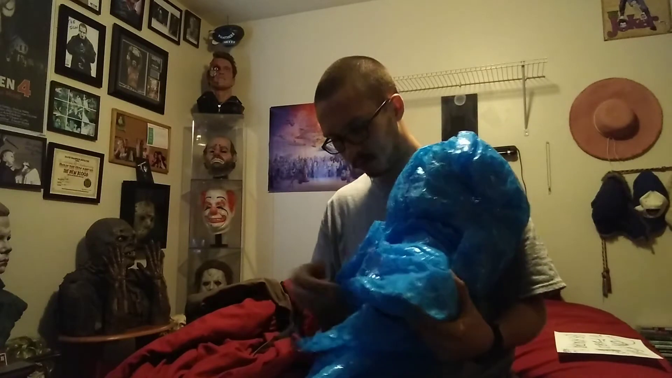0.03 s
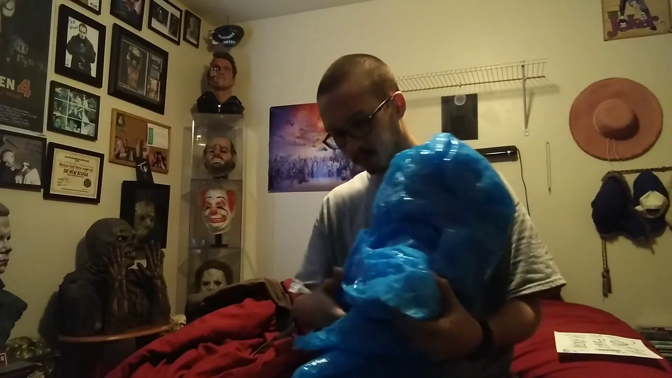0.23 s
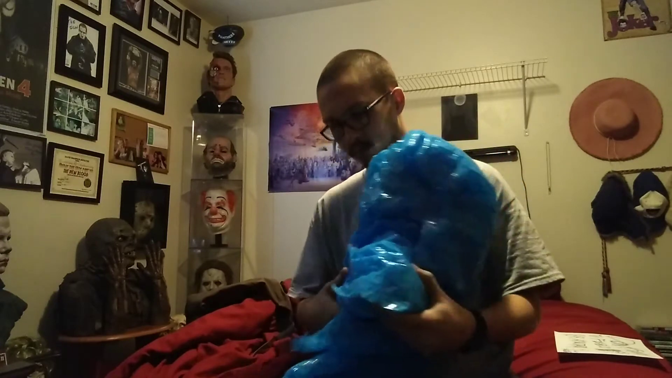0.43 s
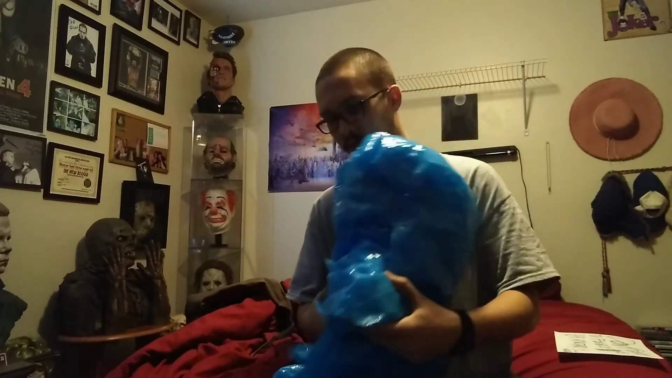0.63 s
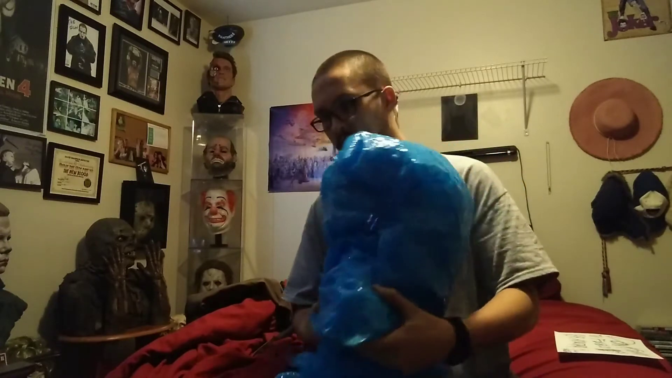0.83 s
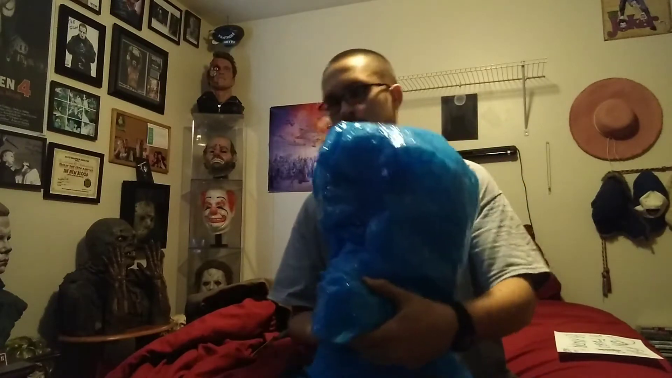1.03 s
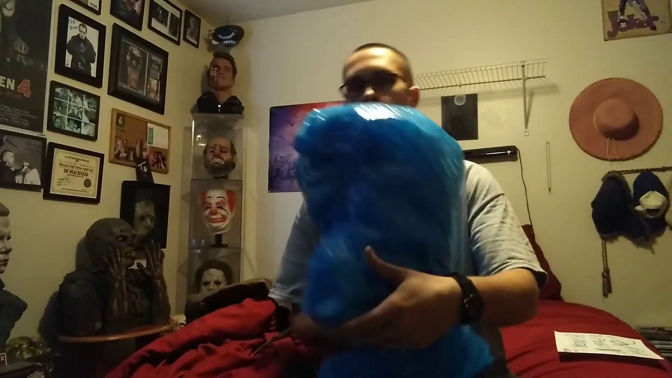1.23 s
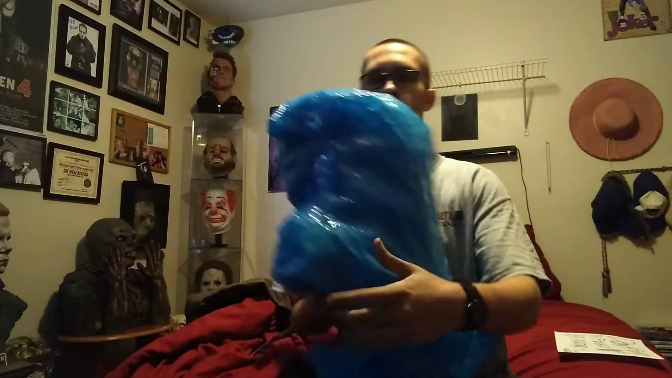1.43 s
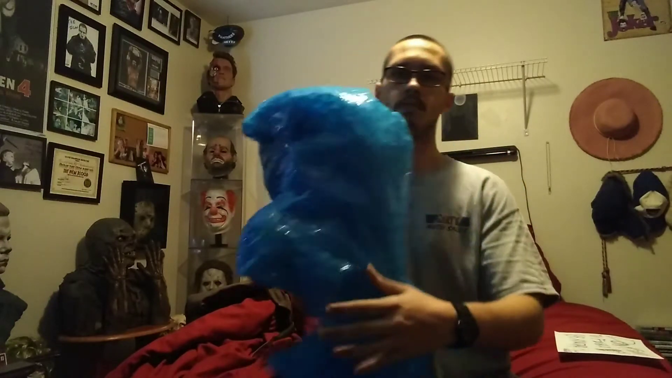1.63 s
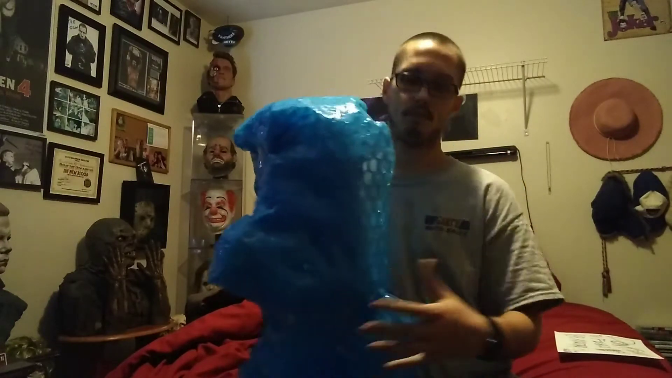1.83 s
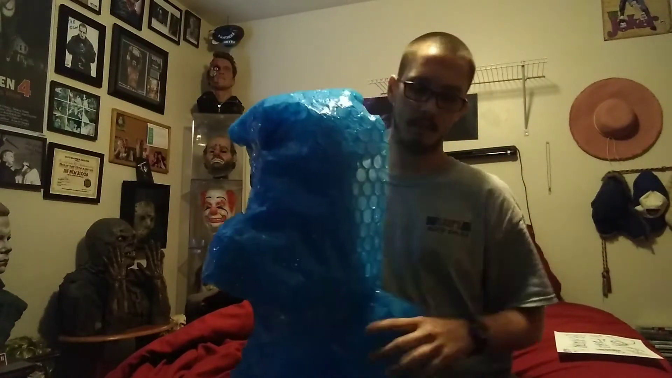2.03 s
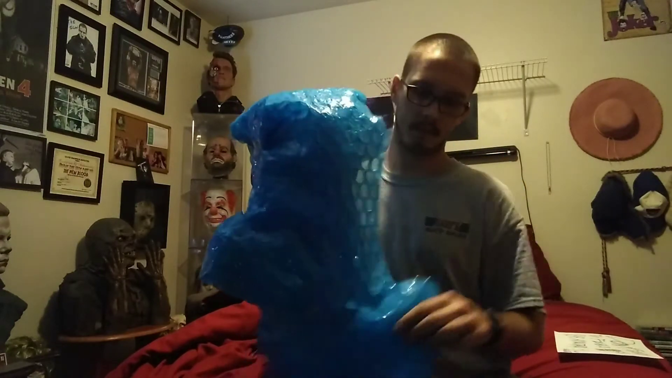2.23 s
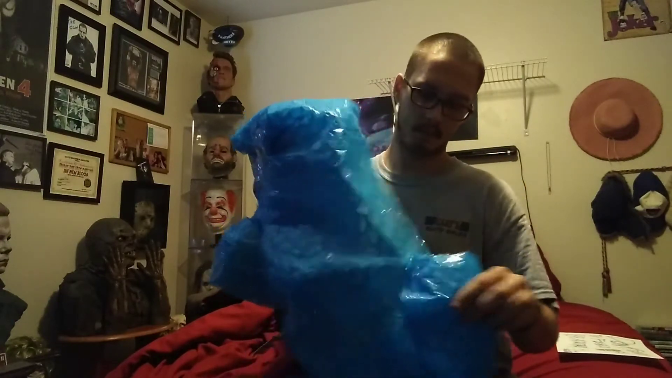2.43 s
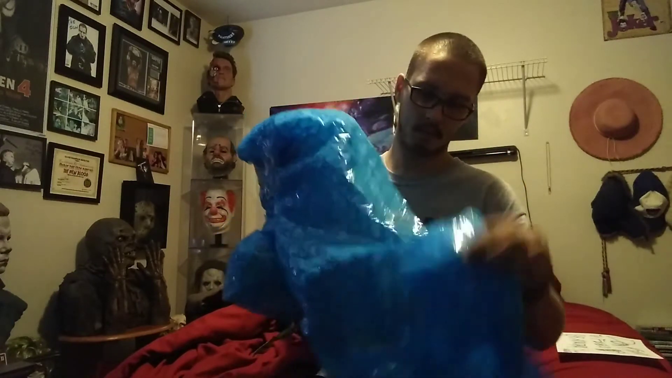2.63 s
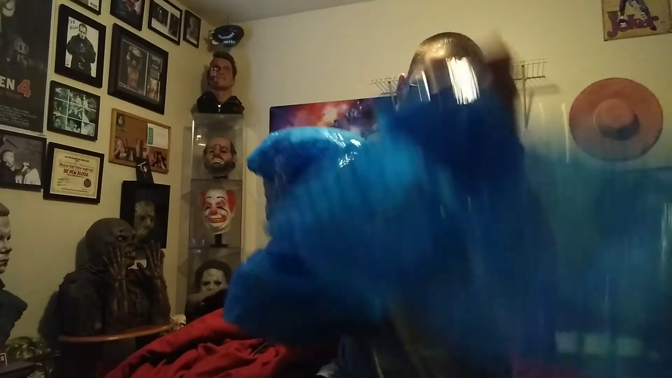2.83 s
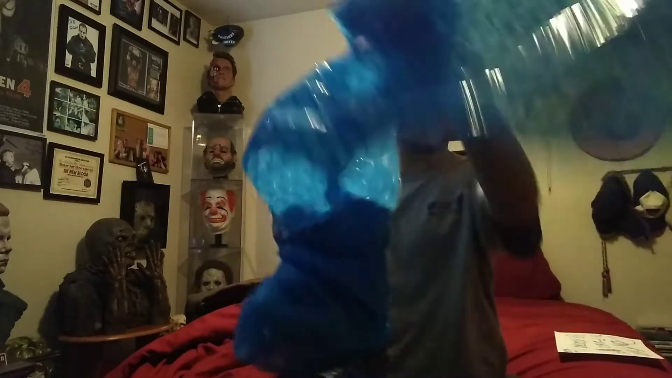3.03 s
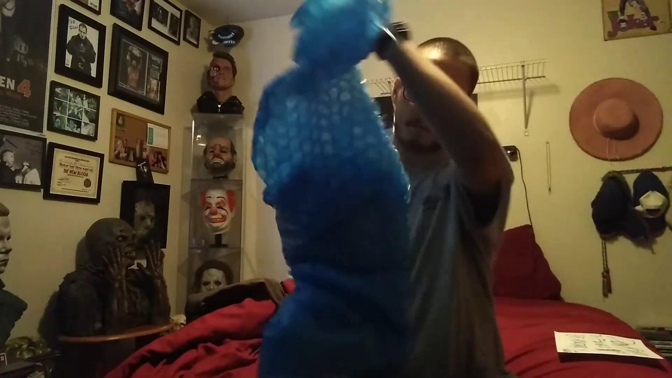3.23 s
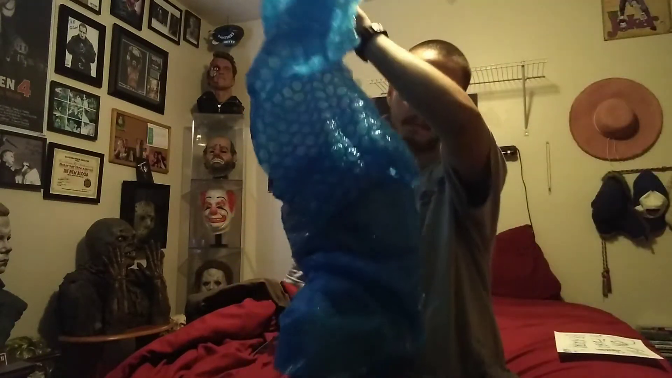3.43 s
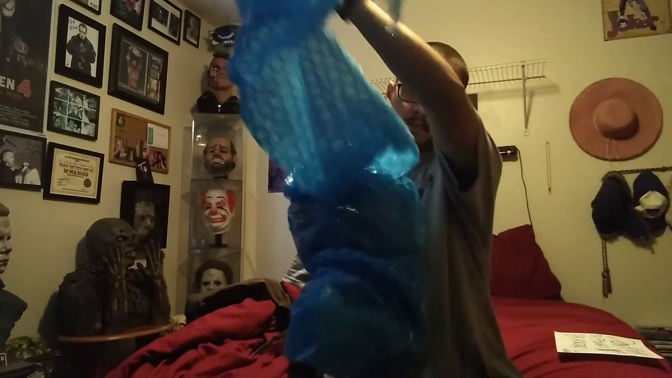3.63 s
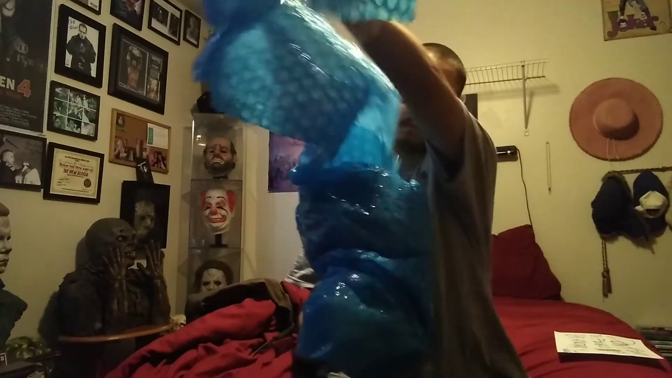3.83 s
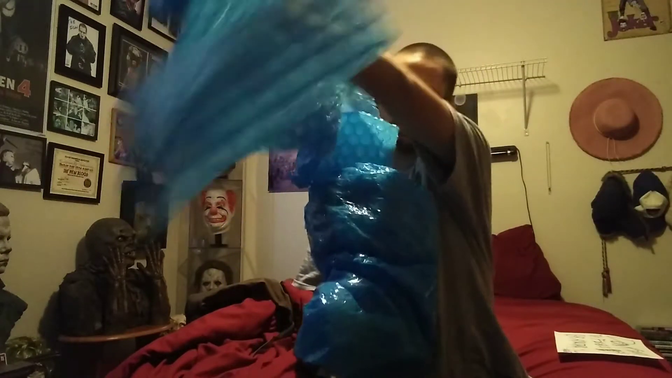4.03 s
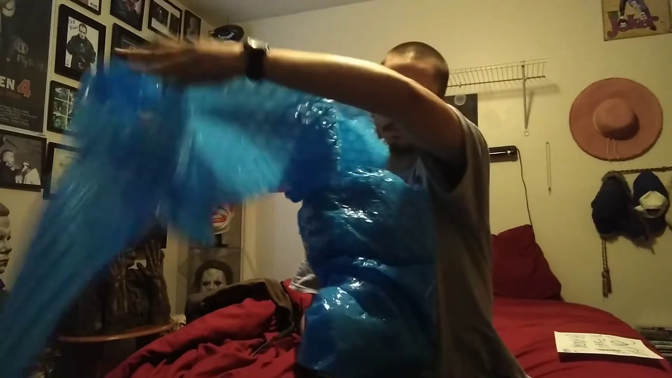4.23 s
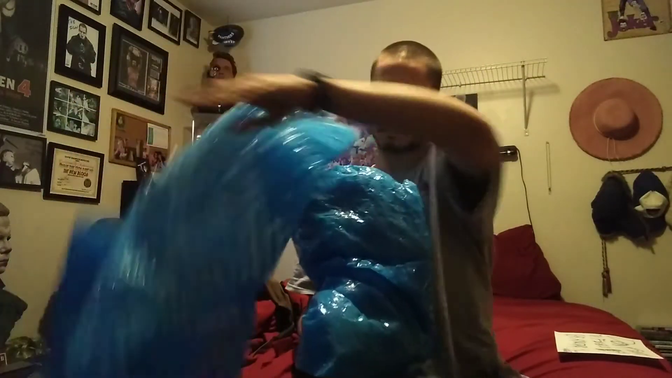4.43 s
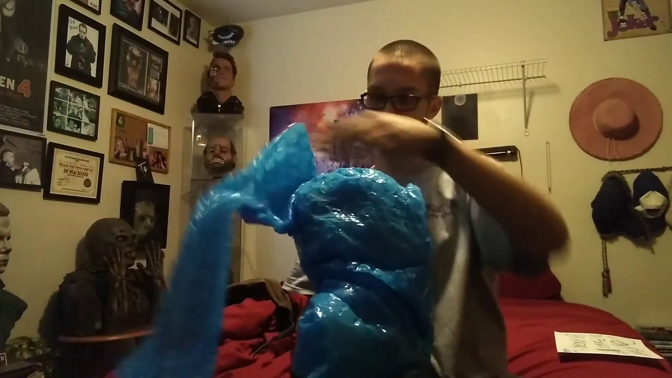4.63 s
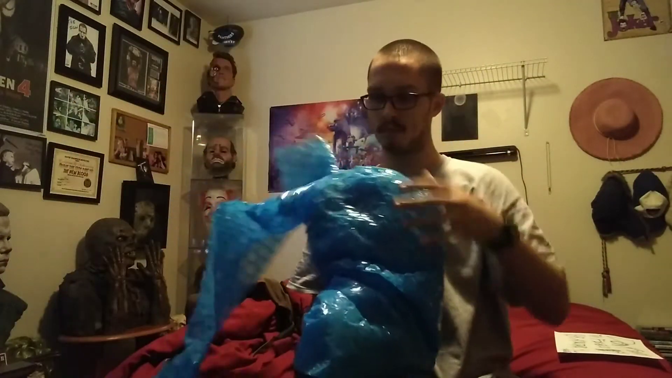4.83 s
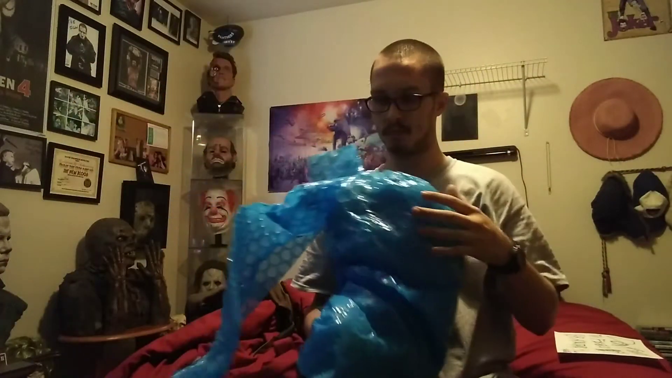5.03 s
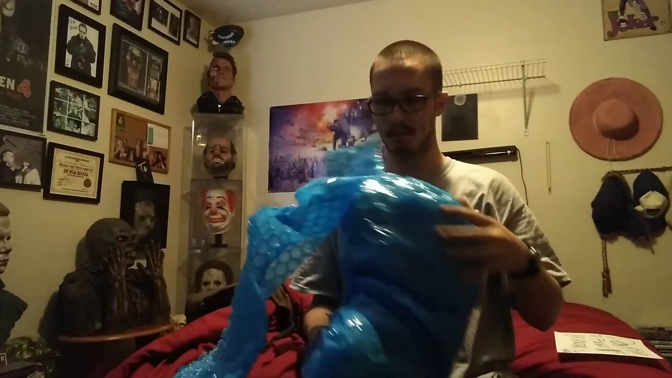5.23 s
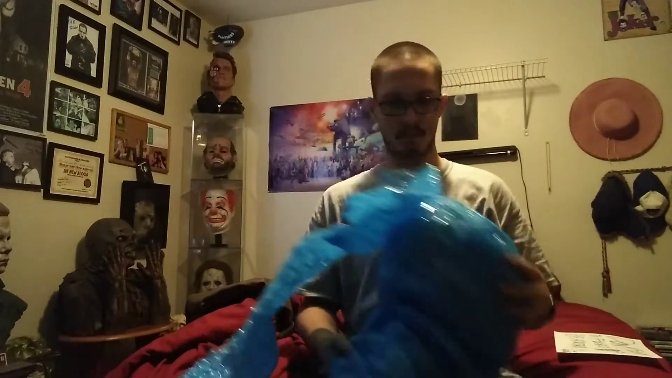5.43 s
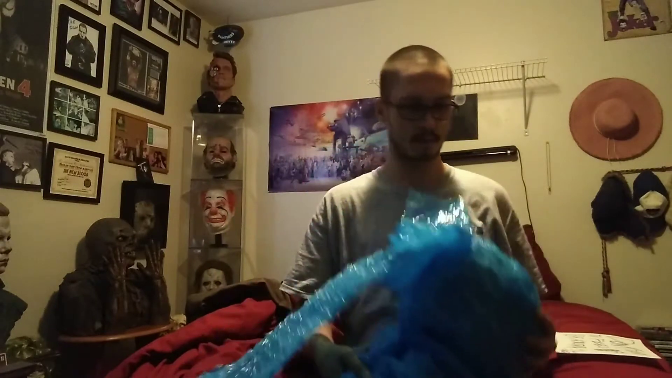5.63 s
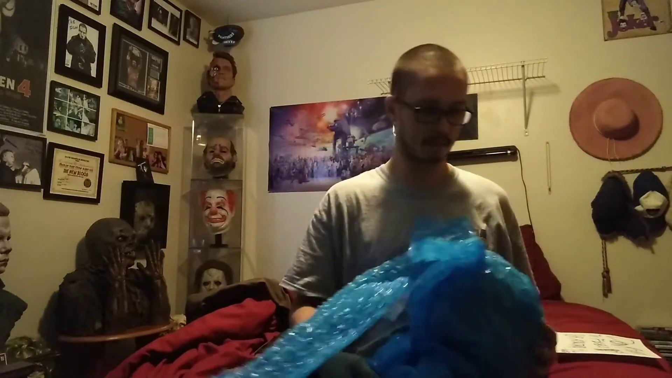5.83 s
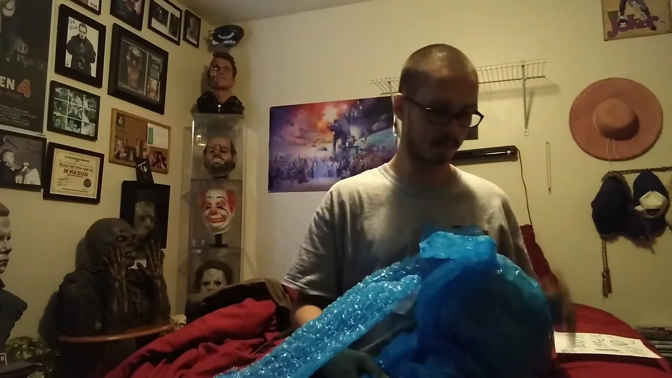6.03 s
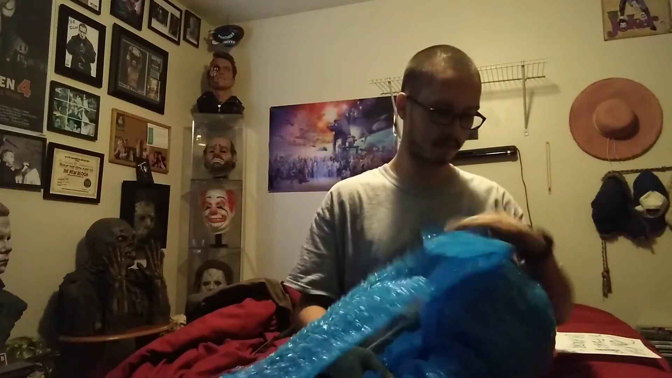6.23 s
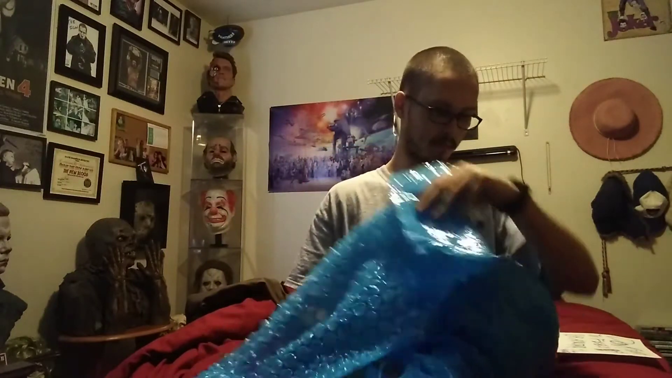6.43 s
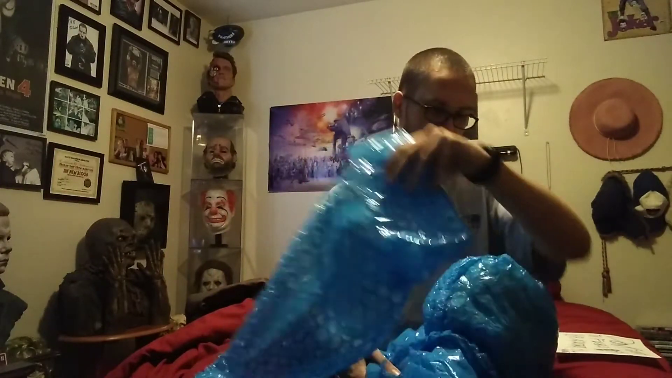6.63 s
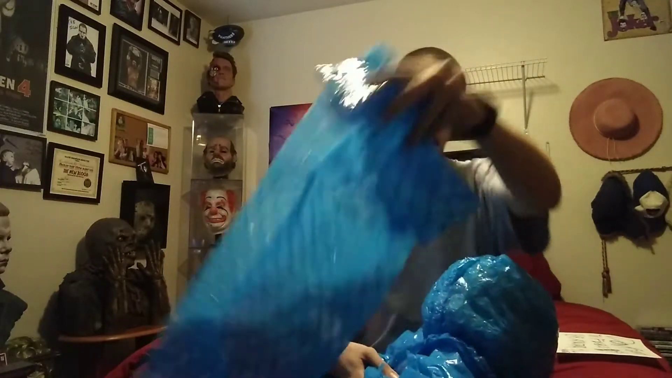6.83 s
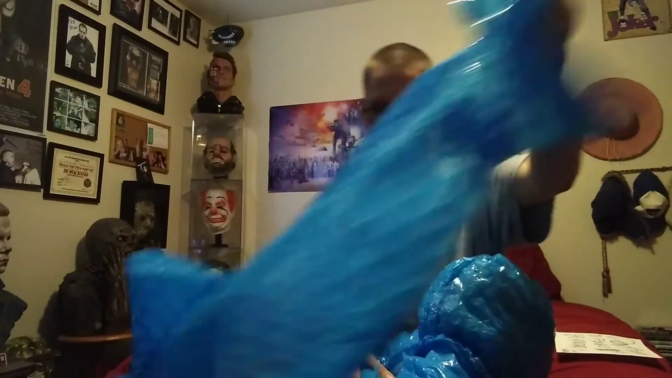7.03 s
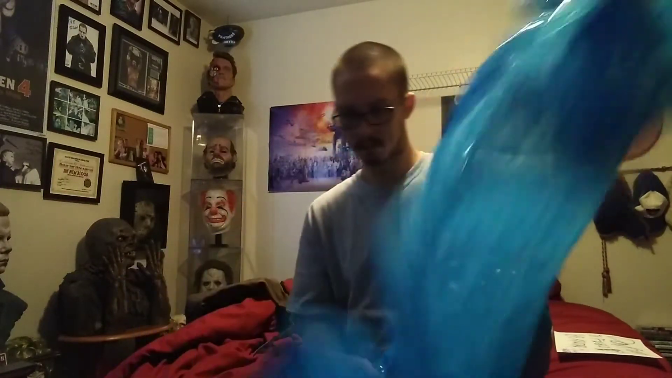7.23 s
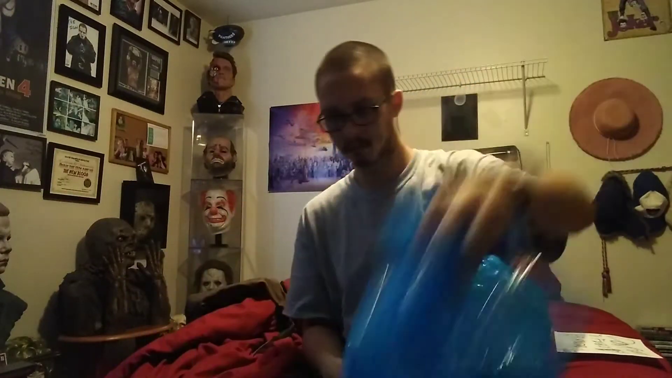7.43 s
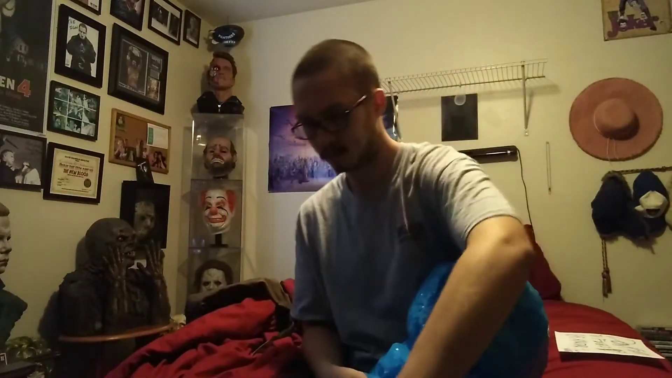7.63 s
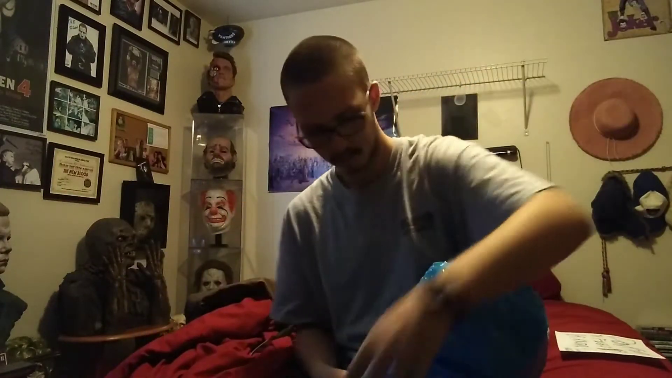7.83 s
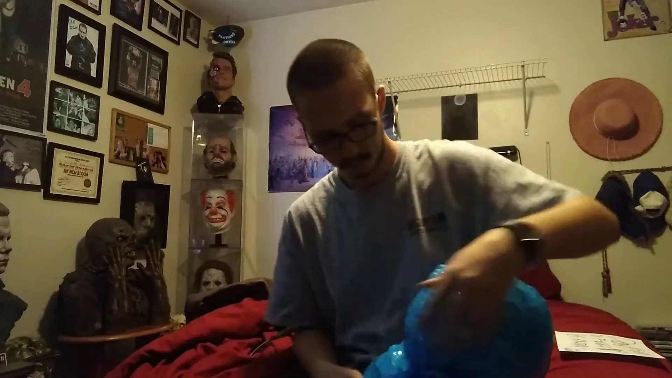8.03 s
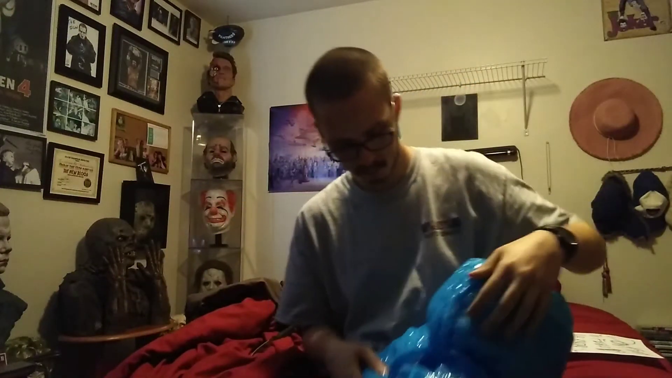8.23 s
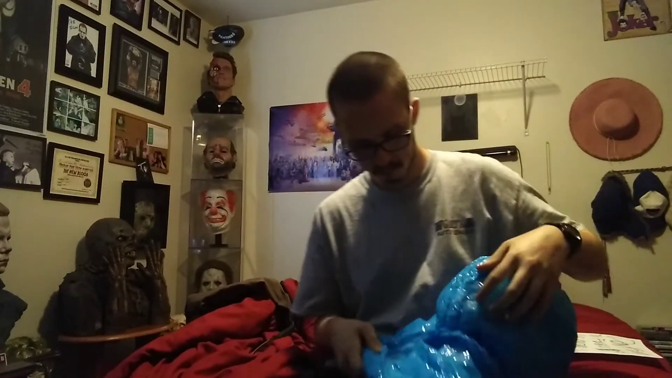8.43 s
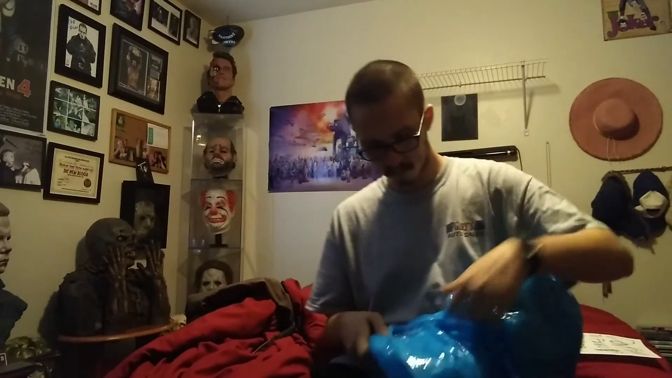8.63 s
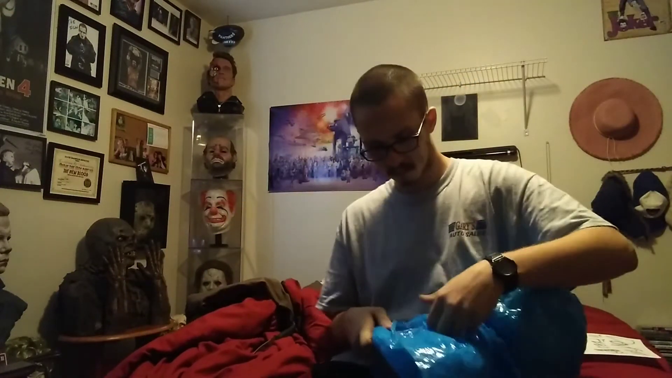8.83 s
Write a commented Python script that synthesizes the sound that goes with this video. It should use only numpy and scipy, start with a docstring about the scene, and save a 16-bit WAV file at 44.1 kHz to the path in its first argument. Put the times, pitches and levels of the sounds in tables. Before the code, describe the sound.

Thin plastic film crackles in swarms of tiny clicks as it is squeezed, pulled and flung about. Gentle at first, it grows brisker and brighter, with sharp creases snapping and hollow knocks, pauses, then gives one loud ripping burst before more swishing crinkle and soft handling. Soft muffled thuds come from the bundle. Wide stereo, short room reflections, faint low hum and still air.

```python
"""Bubble wrap being pulled off a bundled object by hand is the main source: the film buckles in swarms of tiny clicks.
Taut creases and tape let go with louder snaps (short rings plus noise bursts), and freed folds pop hollowly.
The bundle gives soft thuds, made as short fading tones. A low motor hum and still air lie underneath.
It is heard about a metre away in a small, quiet bedroom, through a camera's two microphone ports.
The camera feeds each port into the other channel to widen the stereo."""
import sys
import numpy as np
from scipy import signal
from scipy.fft import rfft, irfft
from scipy.io import wavfile
from scipy.ndimage import uniform_filter1d

SR = 44100
rng = np.random.default_rng(int(sys.argv[2]) if len(sys.argv) > 2 else 0)


def put_to_file(sound):
    """Save the sound as 16-bit audio at rate SR, in the file named by the first command-line argument."""
    columns = np.atleast_2d(sound).T  # one column per channel
    safe = np.clip(columns, -1, 1)
    whole_steps = np.round(safe * 32767)
    wavfile.write(sys.argv[1], SR, whole_steps.astype(np.int16))


N = 392490
TIME = np.arange(N) / SR
FREQS = np.arange(N // 2 + 1) * SR / N


def undb(db):
    """Turn decibels into an amplitude gain."""
    return 10 ** (np.asarray(db) / 20)


def unit(x):
    """Scale a sound to an rms of 1."""
    return x / np.sqrt(np.mean(x ** 2))


def gain_at(hz, points):
    """Read the gain of a (f/Hz, level/dB) curve, joined on a log-frequency axis."""
    f, db = np.transpose(points)
    return undb(np.interp(np.log(hz + 1), np.log(f), db))


def band(x, lo_hz, hi_hz, order=2):
    """Keep only the frequencies between two limits."""
    sos = signal.butter(order, [lo_hz, min(hi_hz, SR / 2 - 1)], "band", fs=SR, output="sos")
    return signal.sosfilt(sos, x)


def add(out, s, sound):
    """Mix a short sound into out at time s."""
    start = max(round(s * SR), 0)
    out[..., start:start + sound.shape[-1]] += sound[..., :N - start]


def room(x, t60_s, wet_db, early_s, early_db):
    """Direct sound, a quick scatter from the bundle and the body, then the bedroom's short tail."""
    t = np.arange(SR // 5) / SR
    scatter, tail = rng.standard_normal((2, 2, len(t)))
    response = undb(early_db) * scatter * np.exp(-t / early_s) / np.sqrt(early_s * SR / 2)
    # the tail builds up quickly, then falls by 60 dB in t60_s
    tail = tail * undb(-60 * t / t60_s) * (1 - np.exp(-t / 0.0041))
    response += undb(wet_db) * unit(tail) / np.sqrt(len(t))
    response[:, 0] += 1  # direct sound
    response /= np.sqrt(np.sum(response ** 2) / 2)
    return signal.fftconvolve(np.atleast_2d(x), response, axes=1)


# Pulls and squeezes of the sheet; taut film is crisp, slack folds have body.
# Columns: start t/s, rise t/s, hold t/s, effort level/dB,
# crispness (treble re effort) level/dB, body (low mids re effort) level/dB; levels before mixing trims
PULLS = [(0.118, 0.086, 0.076, -54.5, -5.5, -8), (0.323, 0.03, .042, -50, -5.5, -4.5),
         (0.49, .036, 0.012, -58.5, -6.5, -2), (0.563, 0.099, 0.013, -57.5, -5, -5),
         (0.879, .09, 0.037, -51, -6, -8), (1.06, 0.022, .075, -53.5, -7, -14),
         (1.225, .02, 0.00498, -59.5, -4.5, -5), (1.282, .065, .012, -62, -3, -5.5),
         (1.441, .028, .045, -50.5, -5.5, -13), (1.52, .04, 0.021, -56, -3, -8),
         (2.142, 0.093, 0.074, -52.5, -3, -7), (2.354, 0.045, .025, -56.5, -5, -8),
         (2.474, 0.084, .003, -43, -1, -7), (2.718, 0.054, 0.109, -54, -4.5, -9),
         (2.95, 0.067, 0.1425, -50, -3.5, -12), (3.11, 0.086, 0.046, -46, -3.5, -9),
         (3.25, .02, .034, -42.5, -1.5, -13), (3.311, 0.0448, 0.213, -51, -2.5, -11.5),
         (3.571, 0.011, 0.099, -39.5, -3.5, -11.5), (3.68, 0.03713, 0.0312, -35.5, -5.5, -8),
         (3.99, 0.019, 0.1864, -54.5, .5, -18), (4.218, .026, 0.029, -41, -2.5, -11),
         (4.441, 0.0442, .008, -57.5, -4, -19), (4.535, .09, 0.0763, -49, -4.5, -6.5),
         (4.772, 0.02, 0.0035, -58.5, -3, -16), (5.72, .13, .06, -50, -6.5, -9),
         (5.959, 0.0379, 0.024, -61.5, -8.5, -5), (6.288, 0.085, .098, -30, -6, -8),
         (6.497, 0.021, .042, -35.5, -6, -8), (6.725, 0.1515, 0.022, -46.5, -2.5, -9),
         (6.885, .055, 0.17, -41.5, -1.6, -15), (7.13, 0.0427, 0.0033, -40.5, -2, -18),
         (7.221, 0.14, 0.02403, -41.5, -4, -19), (7.395, .15, .18, -45, -3.5, -9.5),
         (7.756, 0.02703, 0.0783, -53.5, -7, -4.5), (8.166, 0.0412, 0.0079, -57, -0.5, -11.5),
         (8.599, .1, 0.0977, -57.5, -6, -3.5), (8.778, 0.073, 0.013, -49.5, -7, -4)]
# Between pulls the held bundle shifts lightly in the hands.
# Columns: t/s, effort level/dB
GRIP_EFFORT = [(0, -76), (.6, -66), (1.6, -66.5), (1.8, -74), (2.1, -71), (2.7, -61), (3.5, -61),
               (3.9, -65), (4.5, -65), (4.95, -68.5), (5.3, -65), (5.7, -67.5), (6.13, -74.5), (6.72, -68),
               (7.3, -52.5), (8.02, -63), (8.3, -67), (8.9, -54.5)]


def handling():
    """Pulls tighten, hold and settle; their power adds to the grip's. Gives effort, crispness, body in dB."""
    grip_crisp_db, grip_body_db = -4.5, -7  # re grip effort
    settle_db_per_s = 277  # the film comes to rest after every pull
    grip = undb(np.interp(TIME, *np.transpose(GRIP_EFFORT)))
    # three rows: whole effort, treble, low mids
    power = np.outer(undb([0, grip_crisp_db, grip_body_db]), grip) ** 2
    t = np.arange(SR) / SR
    for s, rise_s, hold_s, db, crisp_db, body_db in PULLS:
        tighten = np.sin(np.pi / 2 * np.minimum(t / rise_s, 1)) ** 2
        settle_s = np.maximum(t - rise_s - hold_s, 0)
        stroke = tighten * undb(db - settle_db_per_s * settle_s)
        add(power, s, np.outer(undb([0, crisp_db, body_db]), stroke) ** 2)
    effort_db, treble_db, low_db = 10 * np.log10(power)
    return effort_db, treble_db - effort_db, low_db - effort_db


# Starting colour of the crinkling film, before its three ranges are levelled.
# Columns: f/Hz, relative level/dB (per Hz)
FILM_COLOUR = [(40, -42), (90, -23), (170, -10), (270, -3), (380, -5.5), (520, 0.5), (900, 4), (1250, -2.5),
               (1900, -5.5), (3000, -7), (4500, -16.5), (8000, -22), (11000, -21.5), (15500, -13.5)]


def buckles(effort_db, per_s, growth, spread_db, colour_db, even_s):
    """A swarm of tiny clicks, denser with effort; each has its own size, colour and place on the sheet."""
    rate = per_s * undb(growth * (effort_db - np.mean(effort_db)))
    at = np.flatnonzero(rng.random(N) < rate / SR)
    size = undb(spread_db * np.minimum(rng.exponential(size=len(at)), 5))
    # a small time lag between the channels places each click, in samples
    lagged = np.clip(at + rng.integers(-14, 15, len(at)), 0, N - 1)
    # the hand's work is shared among the creases that give way at about the same moment
    work = uniform_filter1d(np.bincount(at, size ** 2, N), int(even_s * SR))
    size = size / np.sqrt(work[at])
    out = np.zeros((2, N))
    for hz in np.geomspace(62, 14000, 16):
        colour = undb(colour_db * rng.standard_normal(len(at)))
        push = size * colour * rng.choice([-1, 1], len(at))
        clicks = np.array([np.bincount(at, push, N), np.bincount(lagged, push, N)])
        slice_of_sound = unit(band(clicks + 1e-18, hz / 1.2, hz * 1.2))
        # wider slices hold more power, hence sqrt(hz)
        out += gain_at(hz, FILM_COLOUR) * np.sqrt(hz) * slice_of_sound
    return out


def crinkle(effort_db, crisp_db, body_db):
    """Taut film crackles brightly, slack folds of bubbles sound hollow."""
    clicks = buckles(effort_db, per_s=1000, growth=0.1, spread_db=3.5, colour_db=4, even_s=0.03)
    # the sheet keeps moving, so its reflections keep changing
    swarm, step = np.zeros((2, N)), SR // 10
    for i in range(0, N, step):
        piece = room(clicks[:, i:i + step], t60_s=0.17, wet_db=5.5, early_s=0.0076, early_db=2.0)
        add(swarm, i / SR, piece)
    # a thin sheet pushes no deep bass
    spectrum = rfft(band(swarm, 63, SR / 2))
    # split at 500 and 2500 Hz, so each range can follow the hands
    low = 1 / (1 + (FREQS / 500) ** 8)
    high = 1 - 1 / (1 + (FREQS / 2500) ** 8)
    body = unit(irfft(spectrum * low, N))
    middle = unit(irfft(spectrum * (1 - low - high), N))
    crisp = unit(irfft(spectrum * high, N))
    mix = undb(body_db + 4.0) * body + undb(1.5) * middle + undb(crisp_db + 3.5) * crisp
    return undb(effort_db) * mix


def snap(hz, treble_db, ring_s, crack_s, crack_db, skin_db):
    """The air cushions ring for a few cycles while the film around them cracks."""
    t = np.arange(SR // 20) / SR
    # so small a cushion radiates hardly any bass
    ring = band(np.cos(2 * np.pi * hz * t) * np.exp(-t / ring_s), 250, 3500, order=3)
    burst = rng.standard_normal((2, len(t))) * np.exp(-t / crack_s)
    skin = band(burst, 330, 3940)
    crack = band(burst, 3300, SR / 2, order=1)
    return ring + undb(skin_db) * skin + undb(treble_db + crack_db) * crack


# Creases snapping over.
# Columns: t/s, relative level/dB, ring f/Hz, relative treble level/dB
CREASE_SNAPS = [(0.244, -35.5, 989, -19), (0.345, -36, 1040, -17), (0.37, -36, 466, -24),
                (0.775, -39.5, 1050, -25), (1.072, -34.5, 999.3, -8), (1.302, -42, 912, -18),
                (1.467, -34, 1030, -4.5), (1.909, -46, 570.9, -5), (2.4, -32, 430.8, -1),
                (2.511, -38, 1060, -0.5), (2.551, -25, 663.7, 0), (2.779, -35, 1059, -5),
                (3.202, -26, 950, -17), (3.262, -24.5, 1049, -1.5), (3.658, -26, 950, 0),
                (3.698, -27.5, 821, 6.5), (3.727, -19.5, 494, -2.5), (3.742, -19, 497, -0.5),
                (3.893, -41.5, 810, -26), (3.914, -40, 1426, -27), (4.004, -37, 927.5, -18),
                (4.048, -35.5, 1210, -21), (4.09, -36, 1088, -19.5), (4.233, -29, 889.6, -10),
                (4.786, -41, 810.8, -11), (5.226, -53, 953, -19), (5.419, -45.5, 599, -1),
                (6.514, -23.5, 547.5, -8), (6.769, -42, 832, -16), (7.008, -29, 1000, -16),
                (7.075, -25.5, 851.4, -24), (7.357, -25, 1410, -18), (7.506, -28.5, 505, -5)]


def snaps():
    """Single creases flip over as the sheet is pulled, each a short ring with a crack of noise."""
    out = np.zeros((2, N))
    for s, db, hz, treble_db in CREASE_SNAPS:
        sound = snap(hz, treble_db, ring_s=0.0037, crack_s=0.0022, crack_db=5.5, skin_db=8)
        placed = room(sound, t60_s=0.2, wet_db=-3, early_s=0.005, early_db=-6)
        add(out, s, undb(db - 6) * placed)
    return out


# Stuck folds coming free with a hollow pop.
# Columns: t/s, relative level/dB, ring f/Hz, ring decay t/s
FOLD_POPS = [(3.5829, -14, 596.6, .0042), (3.7006, -26, 725.8, 0.0023), (7.1682, -22, 979.6, 0.00066)]


def pops():
    """A freed fold flicks the whole bundle, which knocks like a small drum."""
    out = np.zeros((2, N))
    for s, db, hz, ring_s in FOLD_POPS:
        sound = snap(hz, -17, ring_s, crack_s=0.016, crack_db=-2, skin_db=-10)
        placed = room(sound, t60_s=0.095, wet_db=-6.5, early_s=0.004, early_db=-26)
        add(out, s, undb(db) * placed)
    return out


# Tape tearing loose in jerks.
# Columns: t/s, relative level/dB
TAPE_JERKS = [(6.356, -14), (6.363, -13.5), (6.371, -10.5), (6.376, -10), (6.381, -8), (6.389, -10.5),
              (6.408, -30), (6.422, -15), (6.425, -14), (6.433, -11), (6.438, -11), (6.454, -29),
              (6.463, -14)]


def rip():
    """Tape lets go bubble by bubble, each jerk plucking the stretched sheet."""
    out = np.zeros((2, N))
    pitch_chances = rng.standard_normal(len(TAPE_JERKS))
    for (s, db), chance in zip(TAPE_JERKS, pitch_chances):
        hz = 880 * np.exp(0.14 * chance)
        sound = snap(hz, -14, ring_s=0.0023, crack_s=0.0021, crack_db=0, skin_db=-1)
        placed = room(sound, t60_s=0.34, wet_db=-4.5, early_s=0.0017, early_db=-13)
        add(out, s, undb(db - 3.5) * placed)
    return out


# The padded bundle bumping against hands and lap.
# Columns: t/s, relative level/dB, f/Hz
BUNDLE_THUDS = [(0.37, -35.5, 442), (0.377, -42, 220.4), (0.651, -45, 472), (2.55, -35, 304.9),
                (4.589, -41.5, 168), (4.631, -34.5, 161), (6.429, -21.5, 504), (6.929, -34.5, 169.8),
                (6.992, -39, 157.6), (7.826, -39.5, 260.2), (7.84, -44, 310)]


def thuds(rise_s, fade_s):
    """Soft contacts set the padded bundle booming briefly."""
    out, t = np.zeros((2, N)), np.arange(SR // 4) / SR
    for s, db, hz in BUNDLE_THUDS:
        boom = np.sin(2 * np.pi * hz * t) * (1 - np.exp(-t / rise_s)) * np.exp(-t / fade_s)
        placed = room(band(boom, 154, 2000), t60_s=0.23, wet_db=-5, early_s=0.0028, early_db=-12)
        add(out, s, undb(db) * placed)
    return out


# How unlike the two ports hear the room.
# Columns: f/Hz, gain on the side signal (half the left-right difference) level/dB
PORT_DIFFERENCE = [(100, -8), (700, -10), (1100, -6.5), (1650, 7), (2400, 3), (3200, -0.5), (15000, .5)]


def ports(x):
    """Long waves reach both ports nearly alike, shorter ones differ more."""
    mid = (x[0] + x[1]) / 2
    side = irfft(rfft((x[0] - x[1]) / 2) * gain_at(FREQS, PORT_DIFFERENCE), N)
    return np.array([mid + side, mid - side])


# Motor hum partials.
# Columns: f/Hz, relative level/dB, left phase lead/rad (before cross-feed)
MOTOR_HUM = [(119.9, 1, -0.48), (238, -2.5, 0.95), (990, -13, -0.52)]
# Colour of the still air in the room.
# Columns: f/Hz, relative level/dB (per Hz)
AIR_COLOUR = [(30, -35), (90, 6), (300, -10), (950, -2), (2000, -12), (5000, -21.5), (15000, -38)]


def background(effort_db):
    """Wavering hum tones and still air; the hum sinks in the pauses and swells with the rustle."""
    swell_db = np.interp(effort_db, [-81, -63.5, -53.0, -29], [-69, -66.5, -58.0, -53.0])
    swell = uniform_filter1d(undb(swell_db), int(0.0083 * SR))
    sides = np.array([[1], [-1]]) / 2
    hum = 0
    for hz, db, lead in MOTOR_HUM:
        waver = unit(band(rng.standard_normal(N), 2.4, 7.9, order=1))
        phase = 2 * np.pi * (hz * TIME + rng.random()) + lead * sides
        hum = hum + undb(db + 1.27 * waver) * np.sin(phase)
    noise = rng.standard_normal((2, N))
    air = unit(irfft(rfft(noise) * gain_at(FREQS, AIR_COLOUR), N))
    return np.sqrt(2) * swell * hum + undb(-73.0) * ports(air)


def scene():
    """The wrap is handled in front of the two ports, over the room's background."""
    effort_db, crisp_db, body_db = handling()
    wrap = crinkle(effort_db, crisp_db, body_db) + snaps() + pops() + rip()
    wrap = wrap + thuds(rise_s=0.00043, fade_s=0.016)
    return ports(wrap) + background(effort_db)


# Share of each port taken from the other channel.
# Columns: f/Hz, level/dB (capped at 0 dB)
CROSSFEED_SHARE = [(400, -30), (1100, -4), (2200, -.5), (4500, -1.3), (7000, -1.3), (8900, -3.5),
                   (10500, -13), (15000, -18)]
# The two ports differ a little in sensitivity.
# Columns: f/Hz, left minus right level/dB
PORT_BALANCE = [(80, 10.5), (200, -3), (1500, -1), (2800, 0), (4500, 1.5), (9500, 1.5), (13000, 1),
                (15500, -3.5)]


def record(dry):
    """Each channel subtracts a delayed copy of the other, notching sum and difference in turn; the top is cut."""
    null_hz, top_hz = 2235, 15600  # the cross-feed delay is 1 / null_hz
    sign = np.array([[1], [-1]])
    left, right = rfft(dry)
    share = np.minimum(gain_at(FREQS, CROSSFEED_SHARE), 1)
    delay = sign * np.exp(-2j * np.pi * FREQS / null_hz)
    # some feedback evens out the response between the notches
    feedback = share * 0.4
    comb = (1 - share * delay) / (1 - feedback * delay)
    # keep the comb's average power at 1
    comb = comb / np.sqrt(1 + (share - feedback) ** 2 / (1 - feedback ** 2))
    mid, side = comb * (left + sign * right) / 2
    balance = gain_at(FREQS, PORT_BALANCE) ** (sign / 2)
    wide = irfft((mid + sign * side) * balance, N)
    return signal.sosfilt(signal.ellip(10, 0.2, 70, top_hz, fs=SR, output="sos"), wide)


dry = scene()
out = record(dry)
put_to_file(out)
```